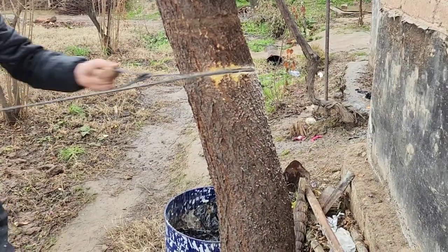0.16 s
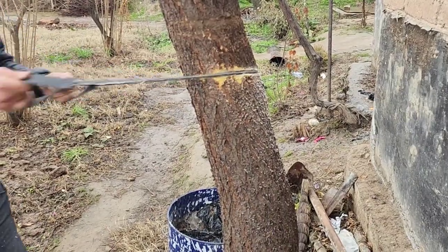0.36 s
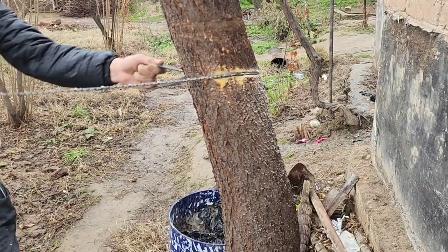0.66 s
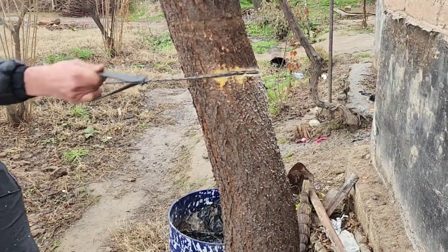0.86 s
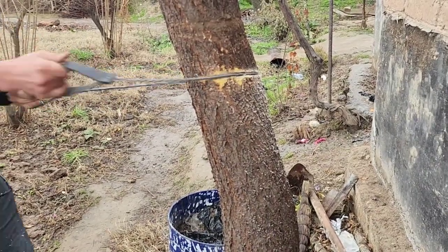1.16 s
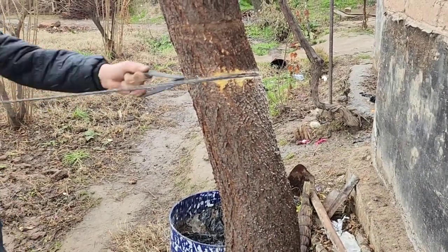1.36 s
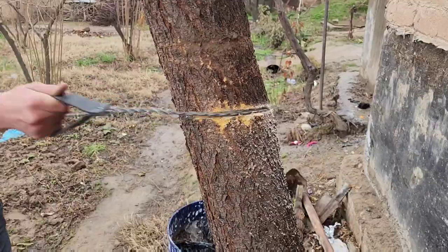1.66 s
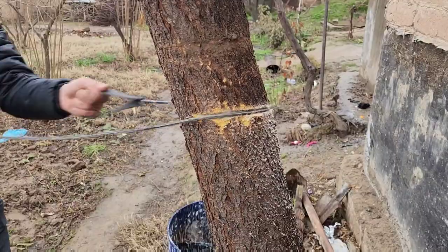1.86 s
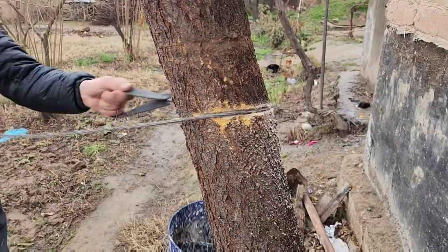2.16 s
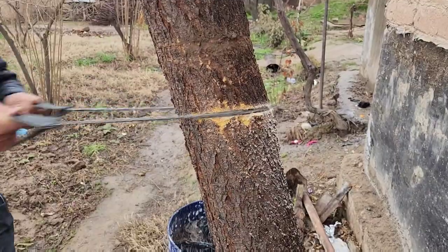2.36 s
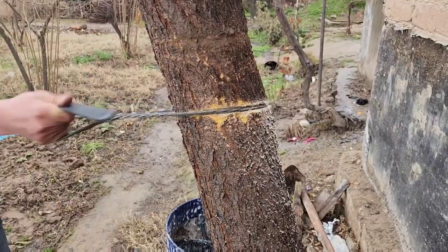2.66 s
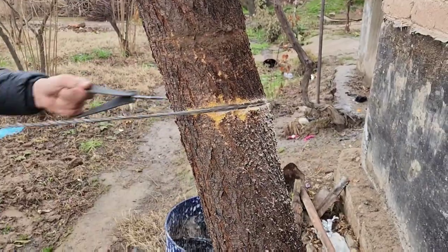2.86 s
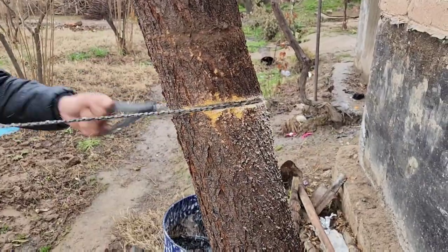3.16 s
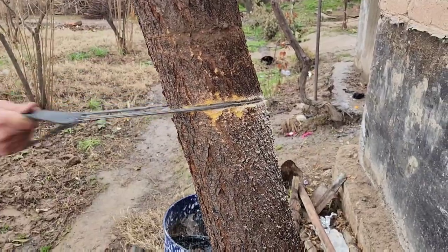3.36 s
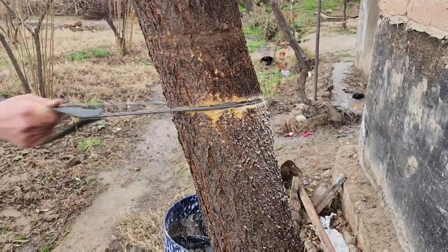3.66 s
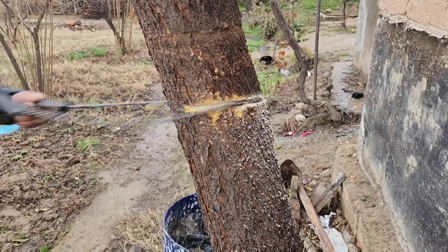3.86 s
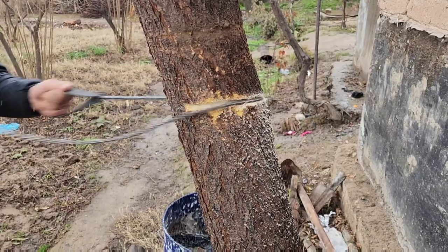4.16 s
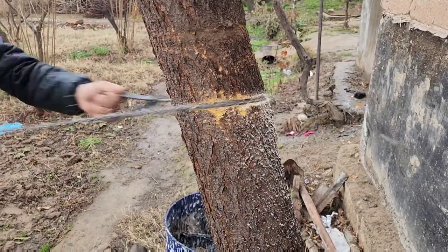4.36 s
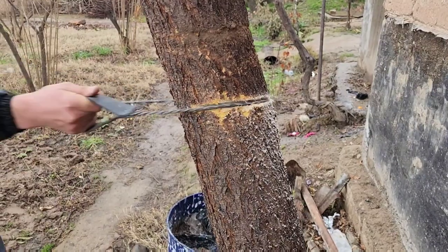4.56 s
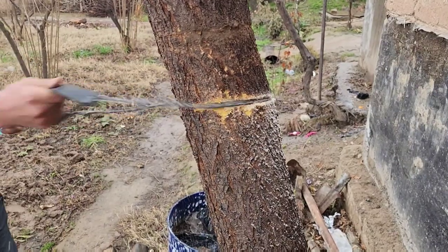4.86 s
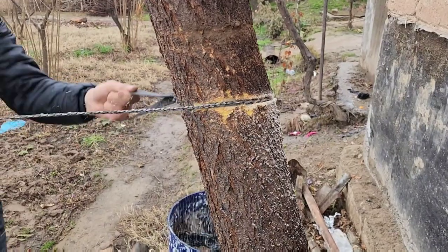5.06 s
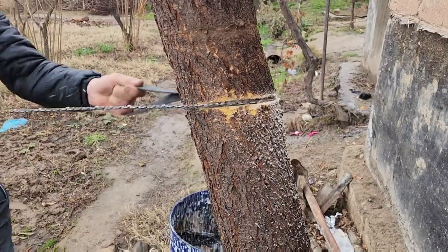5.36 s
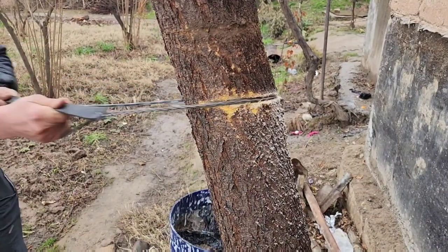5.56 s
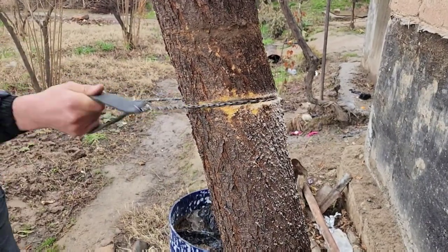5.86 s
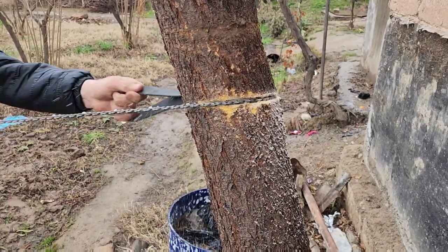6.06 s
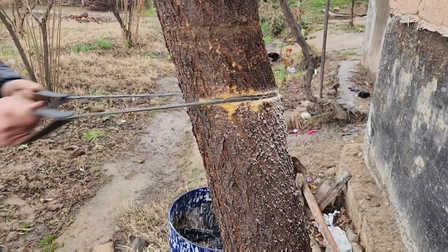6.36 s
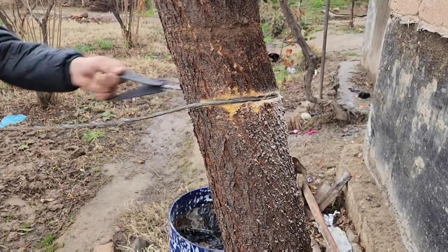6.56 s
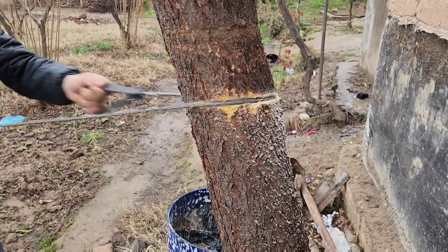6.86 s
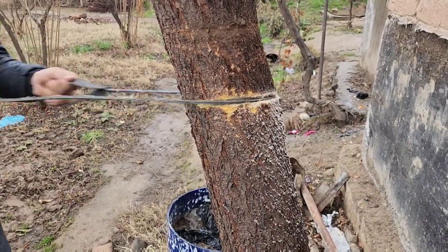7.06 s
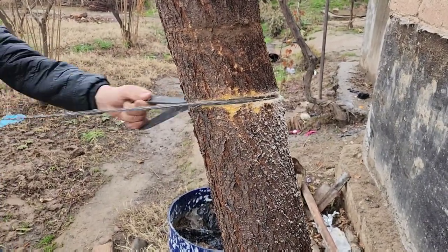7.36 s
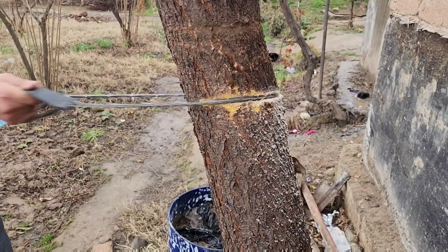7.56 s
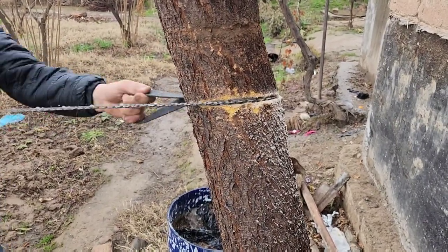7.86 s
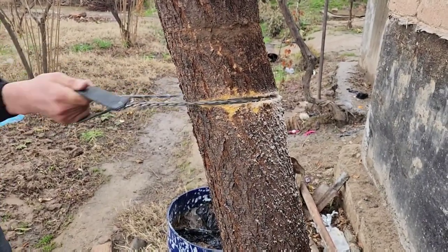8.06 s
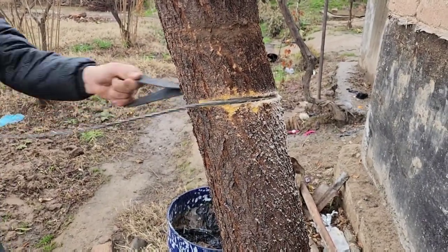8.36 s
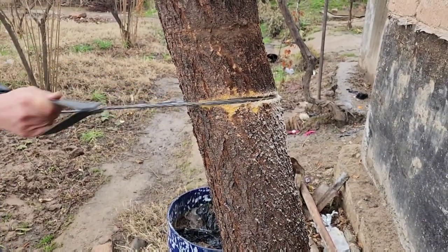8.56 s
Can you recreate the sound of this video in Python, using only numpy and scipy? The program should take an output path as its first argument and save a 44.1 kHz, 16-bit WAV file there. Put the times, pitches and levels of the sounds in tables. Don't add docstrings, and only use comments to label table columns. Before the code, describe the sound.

A hand-pulled saw chain rasps back and forth around a tree trunk outdoors, quick alternating strokes tearing wood with bright metallic crackle and small snaps.

```python
import sys
import numpy as np
from scipy import signal
from scipy.fft import rfft, irfft, next_fast_len
from scipy.io import wavfile
from scipy.ndimage import uniform_filter1d

SR = 44100
rng = np.random.default_rng(int(sys.argv[2]) if len(sys.argv) > 2 else 0)


def nominal_scale(level):
    x = np.asarray(level, float) / 20
    return 10 ** x


def to_wav(s):
    ch = np.atleast_2d(s).T
    pcm = np.round(np.clip(ch, -1, 1) * 32767)
    wavfile.write(sys.argv[1], SR, pcm.astype(np.int16))


N = 383669
T = np.arange(N) / SR

# pitch_hz, width_hz, level_db
LINK_RINGS = [(2686, 590, -9), (5090, 165, -4), (5070, 310, -19), (7805, 750, -8), (10560, 1260, -9.5),
              (13300, 700, -42.5)]
# pitch_hz, level_db
TOOTH_COLOUR = [(900, -39), (2000, -8), (2600, -4.5), (3400, -0.5), (4400, 3.5), (6000, 2), (9500, 0),
                (11500, -6), (13500, -0.5), (15500, -25)]
# pitch_hz, level_db
WOOD_COLOUR = [(150, -55), (310, -12), (450, -4), (620, -7), (900, -3), (1350, -10), (1700, -5),
               (2200, -16), (3500, -13)]
# pitch_hz, width_hz, level_db
TRUNK_RINGS = [(240, 20, -5.5), (507, 44, 6), (780, 800, -11.5)]
# pitch_hz, level_db
RUMBLE_COLOUR = [(40, -22.5), (100, -23.5), (170, -2), (250, 2.5), (310, -1), (600, -36.5)]
# pitch_hz, level_db
AIR_COLOUR = [(25, -24), (60, -7), (130, 6.5), (300, 5), (600, -5), (2500, -11.5), (8000, -15),
              (15500, -27)]
# time_s, level_db
ENGINE_LEVEL = [
    (0.0, -43),
    (0.236, -35),
    (0.44, -51),
    (0.488, -43),
    (0.608, -49),
    (0.748, -42),
    (0.8, -53),
    (1.2, -53),
]
# pitch_hz, likeness (0-1), left_lead_rad, left_minus_right_db
MIC_PORTS = [(60, .97, 0, 0), (150, .98, 0, -2.2), (400, .93, 0, -.3), (800, .87, -.25, 0),
             (1300, .7, .7, -2.8), (2500, .5, 1.2, .5), (3100, .5, 2.2, .5), (4500, .55, .4, .6),
             (7500, .5, 1.3, -.3), (12000, .3, 1.5, 0), (15000, .1, 1.5, 0)]
# pitch_hz, level_db
STEP_BACK_COLOUR = [(400, 0.5), (560, 0.5), (720, -6), (900, -8), (1150, 5), (1500, -5.5), (2000, 2),
                    (2500, -2.5), (3500, 2.5), (6000, -0.5)]
CHIP_PITCHES = [2000, 3300, 5200, 8000, 13000]
# bite_s, length_s, tearing_db, top_link_rate_hz, knock_db
HARD_PULLS = [(0.243, .112, -19, 525.5, -16), (0.634, .123, -19.5, 439.5, -22.5),
              (1.029, .114, -19, 469.3, -19), (1.402, .113, -18.5, 452.3, -19.5),
              (1.841, .087, -15, 494, -15.5), (2.147, .081, -14.5, 596, -23),
              (2.468, .099, -17.5, 519.6, -17), (2.805, .096, -16.5, 434.4, -23.5),
              (3.184, .101, -15.5, 469.4, -18.5), (3.493, .087, -16.5, 525, -16.5),
              (3.79, .094, -17.5, 536.3, -18.5), (4.104, .095, -16.5, 565.6, -21),
              (4.429, .093, -17, 578, -24), (4.766, .092, -18.5, 523.6, -17.5),
              (5.084, .082, -16, 565.8, -22.5), (5.386, .079, -16, 566, -23.5),
              (5.697, .096, -19, 500, -18), (6.071, .096, -16, 524, -15.5), (6.48, .104, -17, 488.2, -15.5),
              (6.922, .118, -17, 397.7, -25.5), (7.387, .121, -17.5, 402.5, -24.5),
              (7.835, .126, -17, 413.6, -24.5), (8.291, .124, -16.5, 415.6, -25)]
# bite_s, length_s, tearing_db, top_link_rate_hz, fastest_share (0-1)
LIGHT_PULLS = [(0.06, 0.11, -19.5, 494, .69), (0.421, 0.14, -22.5, 386, 0.5),
               (0.832, 0.12, -19.5, 452, .52), (1.217, 0.11, -20, 476, .49), (1.688, .11, -18, 584, .58),
               (1.987, 0.1, -17, 320, 0.34), (2.304, 0.1, -18, 440, 0.33), (2.627, .118, -19, 410, 0.42),
               (2.998, 0.12, -20, 338, 0.37), (3.344, 0.098, -17, 512, 0.63), (3.64, 0.098, -17, 500, .62),
               (3.948, 0.099, -18, 536, 0.54), (4.262, 0.1, -18, 578, 0.7), (4.593, 0.11, -19, 494, 0.56),
               (4.927, 0.099, -19, 554, 0.66), (5.232, 0.095, -19, 500, 0.69), (5.539, .11, -21, 566, .67),
               (5.875, .113, -20.5, 452, 0.44), (6.27, 0.13, -20.5, 374, .44),
               (6.689, 0.14, -19.5, 368, 0.48), (7.155, 0.13, -19.5, 332, .35),
               (7.609, 0.14, -19, 398, 0.5), (8.069, 0.13, -18.5, 428, 0.44), (8.5, 0.13, -19, 428, 0.62)]
BROKEN_PULL = [
    (1.607, .056, -19, 320, 0.803),
]
# first_db, second_db, third_db, last_db
PULL_STAGES = [
    (-6.5, 0.22, 0.68, -2.5),
    (-2.5, 0.85, -0.15, -3.5),
]
# time_s, peak_db
SLACK_SNAPS = [(0.5723, -38), (0.6119, -29), (1.0106, -37), (1.0202, -27), (1.367, -36), (1.387, -27),
               (2.4528, -36), (2.9923, -29), (3.474, -35), (4.0976, -20.5), (4.4191, -21.5), (4.755, -33),
               (5.0631, -19.5), (5.2247, -22), (6.4696, -25), (6.909, -27), (7.1372, -26.5), (7.1452, -25),
               (7.3719, -28), (7.5977, -29), (7.8234, -35), (8.0625, -25), (8.279, -17.5), (8.4766, -31),
               (8.4944, -30), (8.6878, -31), (8.6966, -20.5)]
# time_s, peak_db
TOOTH_CATCHES = [(1.6966, -25), (1.84, -18), (1.8508, -18), (1.9301, -17), (2.3084, -20), (2.4735, -20),
                 (2.8102, -19), (2.8871, -26), (4.347, -10.5), (4.593, -24), (4.7702, -16), (5.1659, -18),
                 (5.5567, -13.5), (5.6426, -21), (6.2755, -25), (7.1657, -16.5), (7.2693, -18),
                 (8.0842, -21), (8.2912, -22)]

SCENE_CHANGE_S = 1.668
TIRED_S = 6.2
SPEED_UP_S, SLOW_DOWN_S = .02, .021
RADIATES_HZ = 130
KNOCK_OCTAVE_DB = (-31, -38.5)
WOOD_DB, RUMBLE_DB = (-4.5, -5), (-25, -12.5)
BITE_DB, LET_GO_DB = (-30, -26), (-30.5, -34.5)


def unit(x):
    return x / np.sqrt(np.mean(x ** 2))


def shape(hz, points):
    f, v = np.transpose(points)
    return np.interp(np.log(hz + 1), np.log(f), v)


def modes(hz, table):
    return sum(nominal_scale(db) * 1j * width * hz / (f ** 2 - hz ** 2 + 1j * width * hz) for f, width, db in table)


def walk(rate):
    hold = int(SR / rate)
    steps = np.repeat(rng.standard_normal(N // hold + 1), hold)
    return 1.253 * uniform_filter1d(steps, hold)[:N]


def stereo(pair, colour):
    size = next_fast_len(N + 8192)
    hz = np.arange(size // 2 + 1) * SR / size
    ports = np.array(MIC_PORTS)
    like, lead, tilt_db = (shape(hz, ports[:, [0, k]]) for k in range(1, 4))
    like = np.clip(like, 0, 1)
    left, other = rfft(pair, size) * colour(hz)
    right = like * left * np.exp(-1j * lead) + np.sqrt(1 - like ** 2) * other
    return irfft([left * nominal_scale(tilt_db / 2), right * nominal_scale(-tilt_db / 2)], size)[:, :N]


def yard_air():
    noise = stereo(rng.standard_normal((2, N)), lambda hz: nominal_scale(shape(hz, AIR_COLOUR)))
    return unit(noise) * nominal_scale(-47.5 + 1.5 * walk(3))


def far_engine():
    s, db = np.transpose(ENGINE_LEVEL)
    phase = 2 * np.pi * np.cumsum(120.3 + walk(8)) / SR
    return np.sin(phase) * nominal_scale(np.interp(T, s, db, right=-90) + 3)


def pulls():
    rows = [(*row, .59, 0) for row in HARD_PULLS]
    for bite, span, db, top_hz, share in LIGHT_PULLS + BROKEN_PULL:
        knock_db = -34.5 + 4 * (bite > TIRED_S)
        rows.append((bite, span, db, top_hz, knock_db, share, 1))
    return sorted(rows)


def by_hand(pair):
    return np.interp(T, *np.transpose([(row[0] + row[1] / 2, pair[row[-1]]) for row in pulls()]))


def chain_motion():
    hz, top, hold = np.zeros(N), np.ones(N), np.ones(N)
    level = np.zeros((2, N))
    for bite, span, _, top_hz, knock_db, share, hand in pulls():
        fastest = bite + share * span
        early = (fastest - T) / (share * span + SPEED_UP_S)
        late = (T - fastest) / ((1 - share) * span + SLOW_DOWN_S)
        off = np.maximum(early, late)
        speed = top_hz * np.cos(np.pi / 2 * np.minimum(off, 1))
        octave_db = KNOCK_OCTAVE_DB[hand] + .5 * bite - 3.5 * (bite < SCENE_CHANGE_S)
        octave_db += 1.5 * (1 - hand) * np.clip((457 - top_hz) / 40, 0, 1)
        on = speed > hz + 1
        hz[on], top[on] = speed[on], top_hz
        hold[on & (T > fastest)] = .6
        level[:, on] = nominal_scale(np.array([[knock_db], [octave_db]]))
    return hz, top, hold, level


def link_knocks(wobble=.008, steep=1.7, third_db=-7, flutter_db=1.5):
    hz, top, hold, level = chain_motion()
    phase = 2 * np.pi * np.cumsum(hz * (1 + wobble * walk(120))) / SR
    fade_power = hold * np.clip(steep * level[0] / nominal_scale(-24), .5, steep)
    force = (hz / top) ** fade_power
    ring = np.abs(0.44 + modes(hz, TRUNK_RINGS)) / np.abs(0.56 + modes(top, TRUNK_RINGS))
    radiated = hz ** 4 / (hz ** 4 + RADIATES_HZ ** 4)
    tone = level[0] * ring * radiated * np.sin(phase) * nominal_scale(flutter_db * walk(70))
    overtone_radiated = hz ** 2 / (hz ** 2 + RADIATES_HZ ** 2)
    for k in range(3):
        flutter = nominal_scale(1.0 + third_db * k + flutter_db * walk(90))
        tone += level[1] * force * overtone_radiated * flutter * np.sin((k + 2) * phase + k)
    return nominal_scale(4.3) * force * tone, phase, level[0] * force


def effort(edge_db=-13, lead_s=0.02413, trail_s=0.018, rest_db=-42, drag_db=-25, drag_s=0.0097):
    knots, at = [], np.array([.14, .38, .62, .86])
    for bite, span, db, _, _, share, hand in pulls():
        lean_db = hand * 27 * (share - .5) * (at - .5)
        stages = db + np.array(PULL_STAGES[hand]) + lean_db
        top, release = max(stages), bite + span
        cut = .2 if bite < SCENE_CHANGE_S < release + trail_s else 1
        knots += [(bite - lead_s, top + rest_db), (bite, top + edge_db)]
        knots += [(release, top + edge_db), (release + cut * drag_s, top + drag_db)]
        knots += [(release + cut * (drag_s + trail_s), top + rest_db)]
        knots += zip(bite + span * at, stages)
    level_db = np.interp(T, *np.transpose(sorted(knots)))
    return nominal_scale(uniform_filter1d(level_db, size=300))


def tooth_grip(phase, knock, steel):
    gate = np.clip(0.28 + 2.4 * knock, 0, .9)
    grip = (1 + gate * np.sin(phase)) * nominal_scale(.8 * walk(35))
    slowness = np.clip(1 - steel * nominal_scale(27), 0, 1)
    return grip * nominal_scale(5.0 * slowness * walk(120))


def crackle(density, scatter_db):
    size = (rng.random(N) < density / SR) * nominal_scale(scatter_db * rng.exponential(size=N))
    return unit(size * rng.standard_normal((2, N)))


def steel_colour(hz):
    return nominal_scale(shape(hz, TOOTH_COLOUR)) * (0.22 + 1.31 * modes(hz, LINK_RINGS))


def wood_colour(hz):
    return nominal_scale(shape(hz, WOOD_COLOUR)) * (0.87 + 0.75 * modes(hz, TRUNK_RINGS))


def rumble_colour(hz):
    return nominal_scale(shape(hz, RUMBLE_COLOUR))


def steel_tearing(grip, level, burst, clump_db=2.0, drift_db=1.87):
    out = 0
    for share in np.eye(len(CHIP_PITCHES)):
        band = list(zip(CHIP_PITCHES, share))
        unevenness = nominal_scale(clump_db * walk(200) + drift_db * walk(22))
        grains = grip * unevenness * crackle(11000, 1.8)
        out = out + stereo(level * grains, lambda hz: steel_colour(hz) * np.sqrt(shape(hz, band)))
    match = np.sqrt(np.mean(level ** 2) / np.mean(out ** 2))
    return out * match + stereo(burst, steel_colour)


def through_body(grains, level, burst, colour):
    even = grains / np.std(stereo(grains, colour))
    return stereo(level * even + burst, colour)


def wood_tearing(grip, steel, burst):
    fibres = grip * nominal_scale(0.7 * walk(150)) * crackle(12000, 1.0)
    return through_body(fibres, steel * nominal_scale(by_hand(WOOD_DB) + 4.0), 2.6 * burst, wood_colour)


def trunk_rumble(steel, burst, shake_s=0.024):
    lag = np.exp(-1 / (shake_s * SR))
    push = steel * nominal_scale(by_hand(RUMBLE_DB) - 4 * (T > TIRED_S))
    shake = signal.lfilter([1 - lag], [1, -lag], push)
    return through_body(crackle(4000, 0.93), shake * nominal_scale(1.0 + walk(33)), 2.9 * burst, rumble_colour)


def blows():
    ticks = []
    for bite, span, *_, hand in pulls():
        ticks += [(bite, BITE_DB[hand]), (bite + span, LET_GO_DB[hand])]
    scatter_db = 4 * rng.standard_normal((len(ticks), 1))
    ticks = np.array(ticks) + scatter_db * [0, 1]
    return list(ticks) + SLACK_SNAPS + TOOTH_CATCHES


def snaps(snap_db=4, snap_s=0.00053):
    hit = np.zeros(N)
    for s, db in blows():
        hit[int(s * SR)] = nominal_scale(db + snap_db)
    fade = np.exp(-1 / (snap_s * SR))
    swell = signal.lfilter([np.e * (1 - fade)], [1, -2 * fade, fade ** 2], hit)
    return swell * rng.standard_normal((2, N))


def saw():
    tone, phase, knock = link_knocks()
    steel = effort()
    grip = tooth_grip(phase, knock, steel)
    cutter = 1 + .22 * np.sin(phase / 4)
    burst = snaps()
    rasp = steel_tearing(grip * cutter, steel, burst)
    rasp += wood_tearing(grip, steel, burst)
    rasp += trunk_rumble(steel, burst)
    loaded = np.clip(steel * nominal_scale(38.5), 0, 1)
    return rasp, loaded * tone * nominal_scale(np.array([[-.2], [.2]]))


def echoes(x, t60_s=0.17, wet_db=-21, gap_s=0.0094):
    t = T[:SR // 3]
    tail = rng.standard_normal((2, len(t))) * nominal_scale(-60 * t / t60_s) * (t > gap_s)
    tail /= np.sqrt(np.sum(tail[0] ** 2))
    return nominal_scale(wet_db) * signal.fftconvolve(x, tail, axes=1)[:, :N]


def scene():
    background = yard_air() + far_engine()
    rasp, knocks = saw()
    hz = np.arange(N // 2 + 1) * SR / N
    back = irfft(rfft(rasp) * nominal_scale(shape(hz, STEP_BACK_COLOUR)), N)
    near = np.where(T < SCENE_CHANGE_S, back, rasp) + knocks
    return near + echoes(near) + background


def band_limit(x):
    return signal.sosfilt(signal.butter(12, 16830, fs=SR, output="sos"), x)


def record(dry):
    soft = np.tanh(.8 * dry) / .8
    soft = signal.sosfilt(signal.butter(2, 45, "high", fs=SR, output="sos"), soft)
    cut = signal.sosfilt(signal.ellip(10, .3, 60, 15800, fs=SR, output="sos"), soft)
    return band_limit(np.clip(cut, -1, 1))


dry = scene()
out = record(dry)
to_wav(out)
```